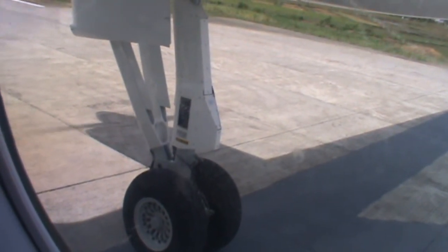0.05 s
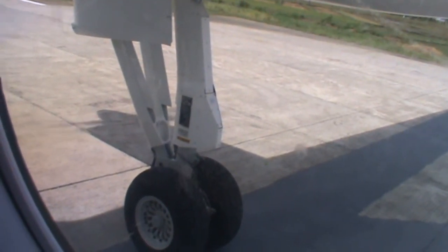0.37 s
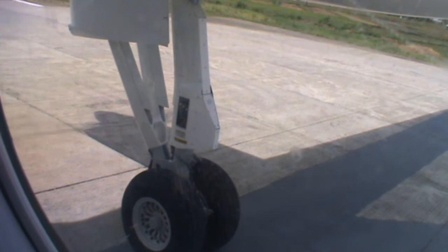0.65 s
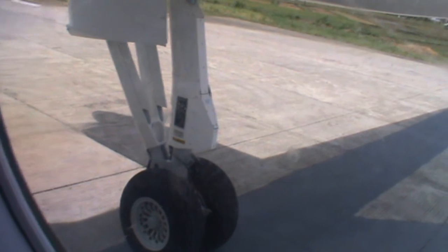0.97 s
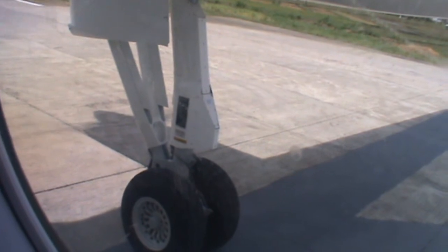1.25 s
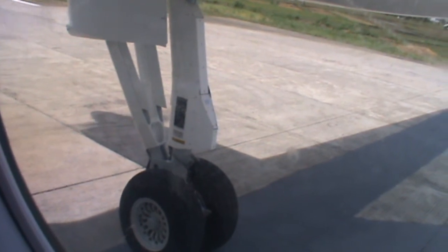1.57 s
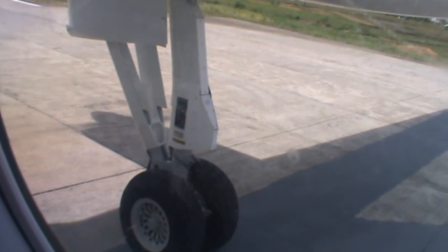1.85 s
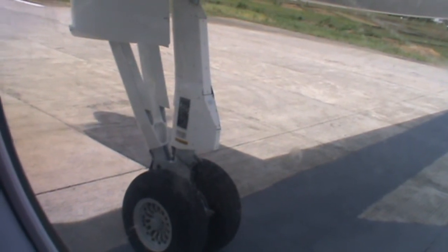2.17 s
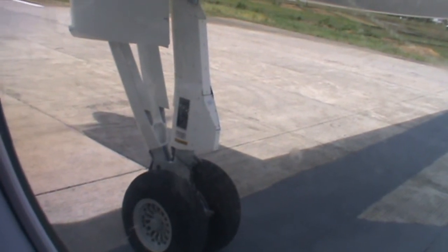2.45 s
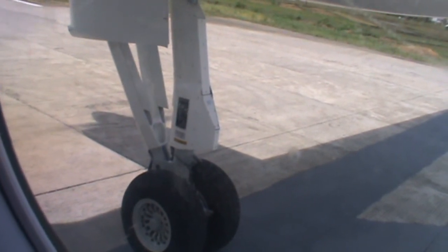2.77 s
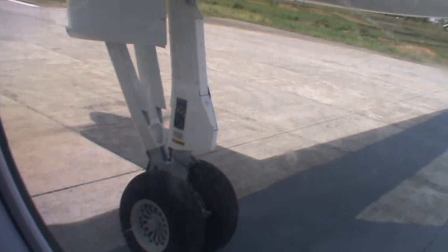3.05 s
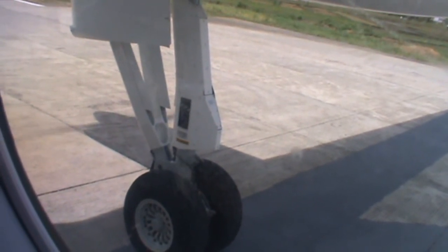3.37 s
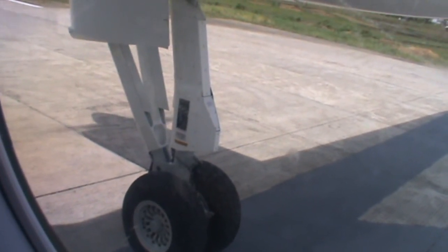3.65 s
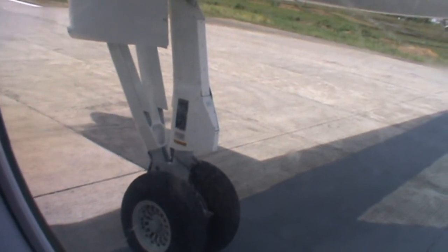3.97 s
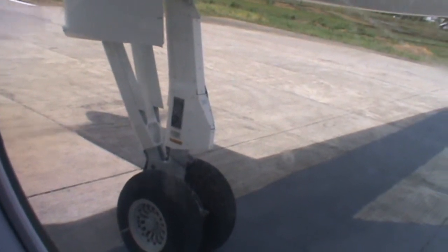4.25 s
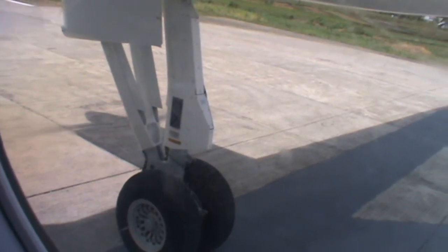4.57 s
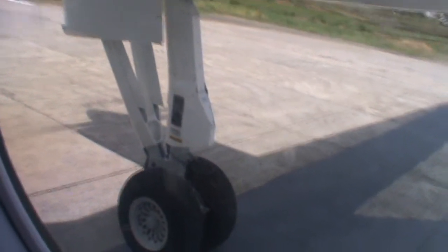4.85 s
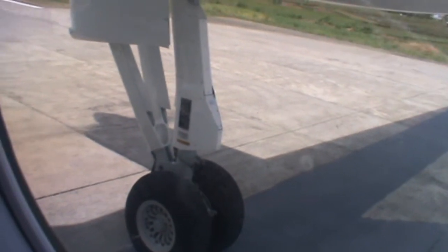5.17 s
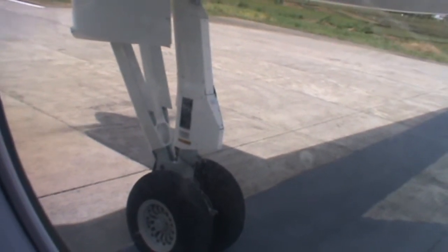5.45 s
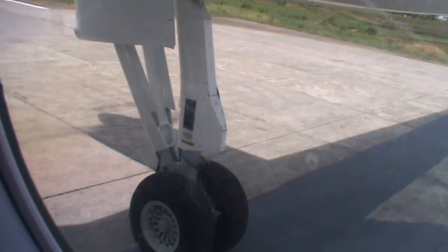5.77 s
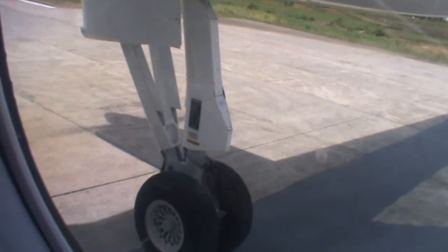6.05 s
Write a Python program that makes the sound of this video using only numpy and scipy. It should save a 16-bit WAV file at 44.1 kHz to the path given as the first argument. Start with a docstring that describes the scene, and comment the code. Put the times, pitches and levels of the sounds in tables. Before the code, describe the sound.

Two propellers of a taxiing plane drone loudly, heard inside the cabin from a window seat beside the engine. For about three seconds they climb in pitch and throb against each other, then settle on one low, buzzy note. A rumbling roar of air and a light hiss run underneath, while two faint, high turbine whines creep upward. The cabin trim gives one tiny squeak during the climb.

```python
"""Two propellers of a taxiing turboprop, heard from a window seat beside the engine.
They speed up for about three seconds, beating against each other, then settle on one note.
Their wash roars through the fuselage, air hisses along the skin, and two hissy turbine whines climb.
Cabin trim squeaks once. A limiter holds the peaks down."""
import sys
import numpy as np
from scipy import signal
from scipy.fft import rfft, irfft
from scipy.io import wavfile
from scipy.ndimage import uniform_filter1d, minimum_filter1d

SR = 44100
rng = np.random.default_rng(int(sys.argv[2]) if len(sys.argv) > 2 else 0)


def to_wav(s):
    """Save 16-bit WAV."""
    ch = np.atleast_2d(s).T  # columns
    pcm = np.round(np.clip(ch, -1, 1) * 32767)  # PCM
    wavfile.write(sys.argv[1], SR, pcm.astype(np.int16))


N = 277827
T = np.arange(N) / SR
FREQS = np.arange(N // 2 + 1) * SR / N
LEFT_RIGHT = np.array([[1], [-1]])
FAR_LAG_PASSES = .52  # far propeller trails by this many blade passes at the start


def propellers(blade_hz, slip_hz, near_buzz_db=-2.9, far_buzz_db=-6.0):
    """Near and far propeller drone and buzz; their speed difference makes them beat."""
    # Upper harmonics under load. Each row: time in seconds, level in dB, tilt in dB per octave.
    buzz_curve = [(0, -23.5, 3.5), (.7, -18.5, 1.5), (1.0, -24, 0), (1.5, -20, 0), (2.4, -21.3, -1),
                  (2.9, -22, 0), (3.6, -23, -2), (4.2, -29, -0.5), (6.3, -25.5, 1.5)]
    # Cabin standing waves at the seat, per propeller. Each row: frequency in Hz, gain in dB.
    near_modes = [(60, -21.5), (66, -17.3), (69, -24), (72, -21.5), (76, -24), (80, -15.9), (120, -26),
                  (130, -17.5), (137, -26.5), (147, -17), (155, -14.8), (162, -26), (195, -28.5),
                  (216, -19.5), (228, -27), (240, -22.5), (270, -22), (325, -32)]
    far_modes = [(60, -29), (66, -22), (72, -25.5), (80, -28.5), (120, -30.5), (150, -32), (163, -29),
                 (195, -28), (240, -33), (270, -24), (325, -36)]
    buzz_db, tilt_db_per_oct = curves(buzz_curve)
    far_hz = blade_hz - slip_hz
    near = undb(near_buzz_db) * blade_buzz(blade_hz, tilt_db_per_oct, flutter_hz=2.06)
    far = undb(far_buzz_db) * blade_buzz(far_hz, tilt_db_per_oct, flutter_hz=1.97)
    throb = blade_drone(blade_hz, near_modes) + blade_drone(far_hz, far_modes, FAR_LAG_PASSES)
    return throb + fuselage(undb(buzz_db) * beat_gain(slip_hz) * (near + far))


def blade_drone(blade_hz, modes, lag_passes=0, gain_db=1.1, lean_db=2.5, left_lead_rad=.4):
    """Harmonics 1-4 glide through the cabin's standing waves; gusts sway the higher ones more."""
    # Each row: multiple of the blade-pass rate, relative level in dB.
    harmonics = [(1, 0), (2, 0), (3, 0), (4, -3.5)]
    # Third-harmonic swells. Each row: centre in seconds, half-length in seconds, lift in dB.
    third_swells = [(3.0, .17, 3.5), (5.1, .15, 4.5)]
    phase = 2 * np.pi * (np.cumsum(blade_hz) / SR - lag_passes)
    out = 0
    for k, db in harmonics:
        lift_db = swells_db(third_swells) if k == 3 else 0
        sway_db = .55 * k * wander(3.5)
        gain = gain_at(modes, k * blade_hz) * undb(db + lift_db + sway_db)
        out += gain * np.sqrt(2) * np.sin(k * phase + LEFT_RIGHT * left_lead_rad / 2)
    return out * undb(gain_db + LEFT_RIGHT * lean_db / 2)


def blade_buzz(blade_hz, tilt_db_per_oct, flutter_hz, steady=.72, spread_rad=.16, lean_db=1.0):
    """Harmonics 5-21; gusts through the disc shake each one, the higher the faster."""
    # Buzz spectrum in the cabin. Each row: frequency in Hz, gain in dB.
    colour = [(230, 4), (300, 6), (340, -4), (420, -1.5), (650, -2.5), (780, -6), (980, -9.5), (1100, -17),
              (1300, -19.5), (1600, -40), (2400, -34)]
    phase = 2 * np.pi * np.cumsum(blade_hz) / SR
    out = 0
    for k in range(5, 22):
        start_rad = rng.uniform(0, 2 * np.pi)
        left_lead_rad = spread_rad * rng.standard_normal()
        angle = k * phase + start_rad + LEFT_RIGHT * left_lead_rad / 2
        rate_hz = flutter_hz * np.sqrt(k)
        tone = (steady + wander(rate_hz) / 2) * np.cos(angle) + wander(rate_hz) / 2 * np.sin(angle)
        tilt_db = tilt_db_per_oct * np.log2(k / 8)
        out += gain_at(colour, k * blade_hz) * undb(tilt_db) * tone
    return unit_rms(out) * undb(LEFT_RIGHT * lean_db / 2)


def beat_gain(slip_hz, depth_db=.9):
    """The roar rises with the two sets of blades out of step, sinks in step, and briefly surges."""
    # Surges during spin-up. Each row: centre in seconds, half-length in seconds, lift in dB.
    surges = [(.6, .05, 2), (1.53, .11, 2.2), (2.27, .12, 2.6), (2.84, .06, 1.8)]
    lag_passes = np.cumsum(slip_hz) / SR + FAR_LAG_PASSES
    return undb(swells_db(surges) - depth_db * np.cos(2 * np.pi * lag_passes))


def airflow(blade_hz, slip_hz, rumble_db=-20.3, surge_db=.4, flicker_db=1.1, chop_depth=.14):
    """Prop wash shakes the fuselage; rush and hiss share a fast level flicker and pulse per blade."""
    # Each row: time in seconds, then relative levels of wash, skin rush and window hiss in dB.
    flow = [(0, -21, -39.5, -44.6), (.58, -20.6, -38.8, -45.2), (.7, -24.8, -43, -49.2),
            (1.05, -23, -42.2, -48.8), (1.22, -18.8, -41.5, -47.2), (2.1, -21, -43, -48.6),
            (3.5, -18.5, -42.4, -49.3), (4.2, -21, -42.1, -52.5), (5.0, -19.9, -42, -50.3),
            (6.3, -19.4, -42, -49.7)]
    # Spectra in the cabin. Each row: frequency in Hz, gain in dB.
    rumble_colour = [(15, -9), (30, -18), (55, -6.5), (90, -4.5), (120, -5), (150, 0.5), (190, -1.5),
                     (280, 1), (350, -9.5), (500, -22), (900, -66.5)]
    wash_colour = [(150, -43.5), (280, -6.5), (400, -0.5), (620, -2.5), (760, -3.5), (900, -8.5),
                   (1010, -7.5), (1100, -13.5), (1400, -23), (2000, -41.5), (4000, -70)]
    rush_colour = [(700, -60), (1400, 5), (1900, -1), (2300, -2.5), (3000, -8), (4000, -14), (6000, -27),
                   (10000, -47)]
    hiss_colour = [(2500, -16), (4000, -1.5), (5200, 1), (6100, 0), (7500, 1), (8700, 0), (9400, -4),
                   (10200, -10), (11200, -14), (12500, -21), (15500, -26.5)]
    wash_db, rush_db, hiss_db = curves(flow)
    surge = beat_gain(slip_hz) * undb(surge_db * wander(6.0))
    flicker = undb(flicker_db * wander(46))
    chop = 1 + chop_depth * np.sin(2 * np.pi * np.cumsum(blade_hz) / SR)
    rumble = undb(rumble_db) * cabin_noise(rumble_colour)
    wash = fuselage(undb(wash_db - 3.6) * surge * cabin_noise(wash_colour))
    rush = undb(rush_db + 1) * cabin_noise(rush_colour)
    hiss = undb(hiss_db - 1) * cabin_noise(hiss_colour)
    return rumble + wash + flicker * chop * (rush + hiss)


def cabin_noise(colour):
    """Turbulence arriving from many walls, a little stronger on the left."""
    # Each row: frequency in Hz, side minus mid in dB.
    width = [(60, -14), (130, -27), (250, -4), (500, -9.5), (1000, -9), (2000, -6), (4000, -8), (8000, -15),
             (12000, -4.5)]
    # Each row: frequency in Hz, left minus right in dB.
    lean = [(60, 4), (130, 6.5), (500, 3), (2000, 1.5), (4000, 1), (12000, 0)]
    mid, side = rfft(rng.standard_normal((2, N))) * gain_at(colour, FREQS)
    spectra = mid + LEFT_RIGHT * side * gain_at(width, FREQS)
    balance = gain_at(lean, FREQS) ** (LEFT_RIGHT / 2)
    ears = irfft(spectra * balance, N)
    return ears / np.std(ears.mean(axis=0))


def fuselage(x):
    """Panel resonances lift narrow bands of whatever passes through the wall."""
    # Each row: centre in Hz, width in Hz, lift in dB.
    panels = [(251, 57, 3), (406.7, 21, 3.5), (476, 95, 3), (590, 48, 3), (730, 43, 4), (865, 31, 3),
              (951, 38, 5), (1159, 45, 5.5)]
    lift_db = sum(db / (1 + (2 * (FREQS - hz) / width_hz) ** 2) for hz, width_hz, db in panels)
    return irfft(rfft(x) * undb(lift_db), N)


def turbine():
    """Two spools wind up; turbulence smears each compressor tone into a hissy whine."""
    # Each row: time in seconds, low and high whine pitch in Hz, low and high whine level in dB.
    spools = [(0, 5570, 6600, -52, -52), (.6, 5750, 6800, -54, -54), (1.4, 5960, 7100, -58.5, -54),
              (2.2, 6188, 7740, -66, -60), (3.0, 6480, 8150, -62, -55), (3.8, 6647, 8500, -68, -58),
              (4.3, 6650, 8600, -67, -60), (6.3, 6800, 8650, -63, -59)]
    low_hz, high_hz, low_db, high_db = curves(spools)
    low = undb(low_db) * rough_tone(low_hz, width_hz=170)
    high = undb(high_db) * rough_tone(high_hz, width_hz=420)
    return low + high


def trim_squeak(at_s=2.355, sigma_s=.018, hz=3540, db=-47.5, octave_db=-7):
    """A piece of cabin trim gives one faint, rough squeak."""
    pitch_hz = np.full(N, hz)
    tone = rough_tone(pitch_hz, width_hz=140)
    octave = undb(octave_db) * rough_tone(2 * pitch_hz, width_hz=180)
    envelope = np.exp(-.5 * ((T - at_s) / sigma_s) ** 2)
    return undb(db) * envelope * (tone + octave)


def rough_tone(hz, width_hz, side_db=-13):
    """Narrow stereo noise band that follows a pitch."""
    phase = 2 * np.pi * np.cumsum(hz) / SR
    mid, side = (wander(width_hz) * np.cos(phase) + wander(width_hz) * np.sin(phase) for _ in range(2))
    return mid + LEFT_RIGHT * undb(side_db) * side


def wander(rate_hz):
    """Smooth random motion, rms 1, rolling off around rate_hz."""
    lowpass = np.exp(-.5 * (FREQS / rate_hz) ** 2)
    return unit_rms(irfft(rfft(rng.standard_normal(N)) * lowpass, N))


def swells_db(table):
    """Sum of Gaussian swells over time."""
    return sum(db * np.exp(-((T - at_s) / half_s) ** 2) for at_s, half_s, db in table)


def curves(table):
    """Each value column, interpolated linearly in time."""
    times_s, *columns = np.transpose(table)
    return [np.interp(T, times_s, column) for column in columns]


def gain_at(spectrum, hz):
    """Linear gain of a (Hz, dB) spectrum, interpolated in log frequency."""
    points_hz, db = np.transpose(spectrum)
    return undb(np.interp(np.log(np.maximum(hz, 1)), np.log(points_hz), db))


def undb(db):
    return 10 ** (np.asarray(db) / 20)


def unit_rms(x):
    return x / np.sqrt(np.mean(x ** 2))


def scene():
    """Propellers, their wash, the turbine and a squeak of trim."""
    # Near propeller. Each row: time in seconds, blade-pass rate in Hz.
    speed = [(0.0, 61.11), (0.3, 60.71), (0.7, 64.43), (1.2, 67.28), (1.6, 70.39), (2.4, 74.71),
             (2.9, 79.04), (3.3, 79.01), (3.7, 82.11), (4.1, 81.02), (4.5, 80.08), (5.2, 80.38),
             (6.3, 80.25)]
    # Each row: time in seconds, near minus far blade-pass rate in Hz.
    slip = [(0.0, 0.76), (0.95, 1.92), (1.4, 3.29), (2.25, 4.1), (2.8, 3.33), (3.2, 0.07), (4.2, -0.17),
            (6.3, 0.07)]
    blade_hz = curves(speed)[0]
    slip_hz = curves(slip)[0]
    return propellers(blade_hz, slip_hz) + airflow(blade_hz, slip_hz) + turbine() + trim_squeak()


def record(dry):
    """A limiter ducks just before each peak and recovers within a blade pass or two; the top is cut."""
    threshold, slope, top_hz = undb(-3), .7, 15750
    attack_n, hold_n = int(.005 * SR), int(.02 * SR)
    peak = np.abs(dry).max(axis=0)
    allowed = (threshold / np.maximum(peak, threshold)) ** slope
    held = minimum_filter1d(allowed, hold_n, origin=(hold_n - attack_n) // 2)
    gain = uniform_filter1d(held, attack_n)
    lowpass = signal.ellip(8, .2, 70, top_hz, fs=SR, output="sos")
    return signal.sosfilt(lowpass, dry * gain)


dry = scene()
out = record(dry)
to_wav(out)
```